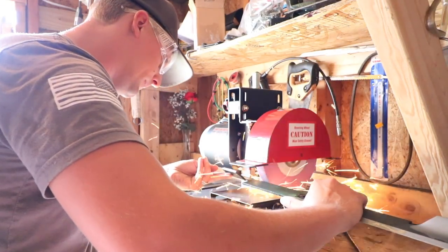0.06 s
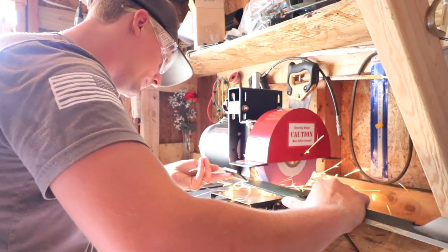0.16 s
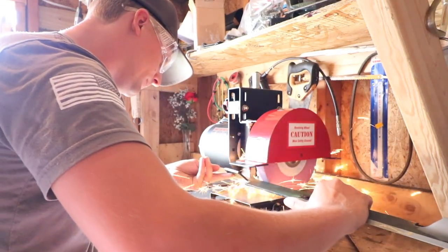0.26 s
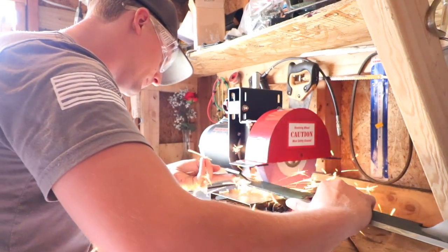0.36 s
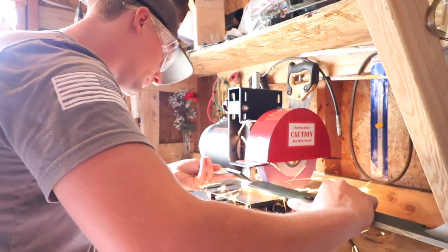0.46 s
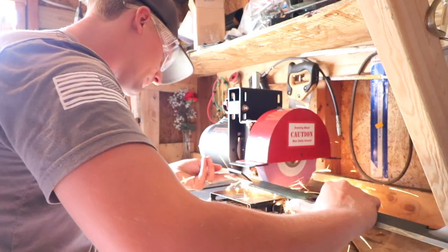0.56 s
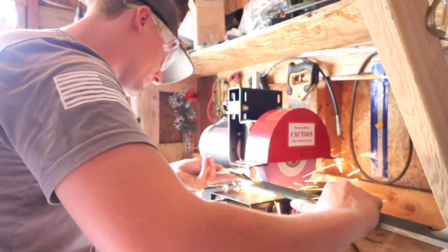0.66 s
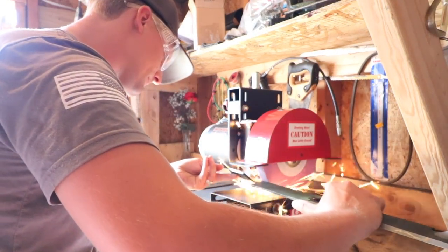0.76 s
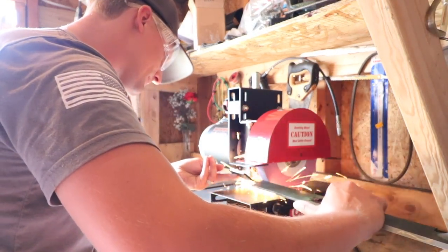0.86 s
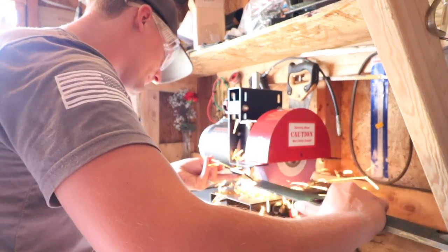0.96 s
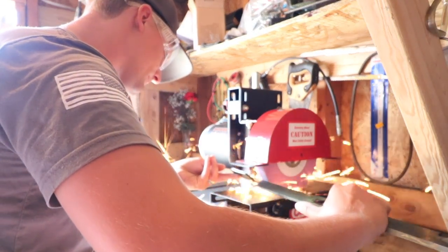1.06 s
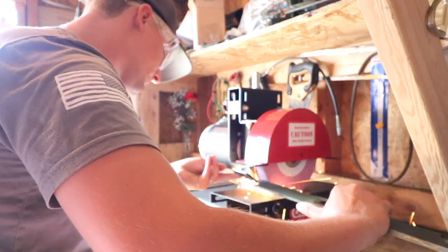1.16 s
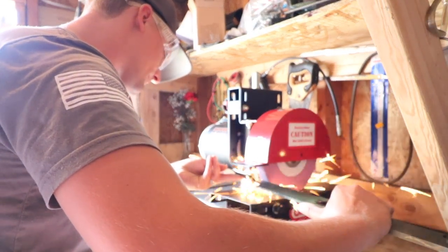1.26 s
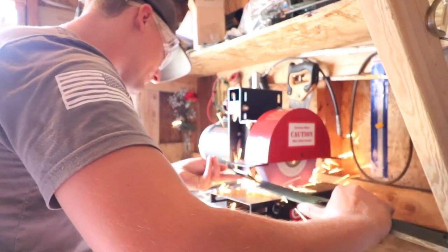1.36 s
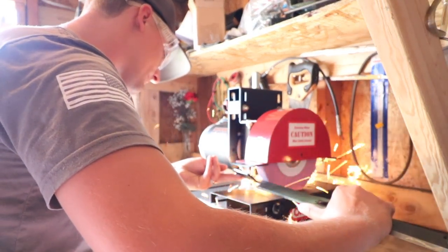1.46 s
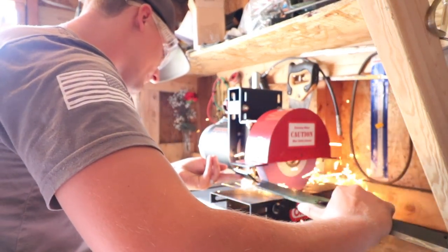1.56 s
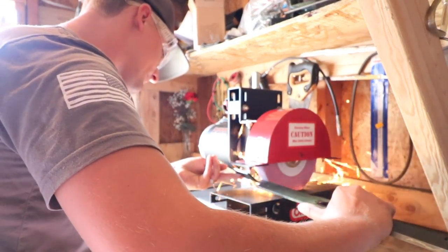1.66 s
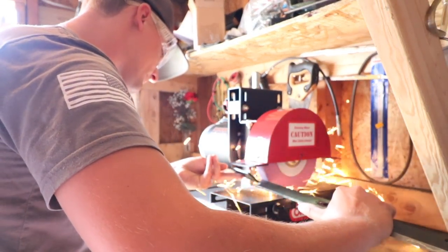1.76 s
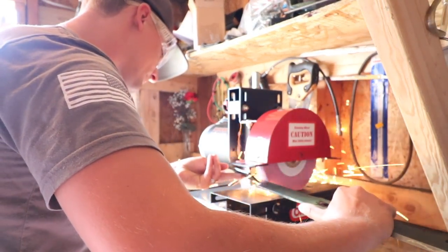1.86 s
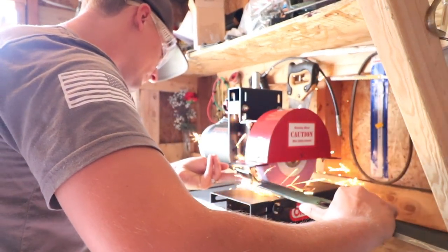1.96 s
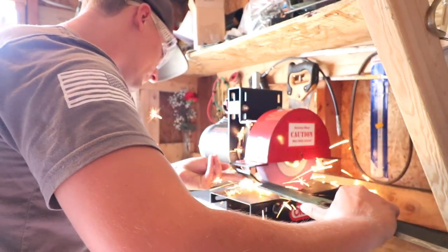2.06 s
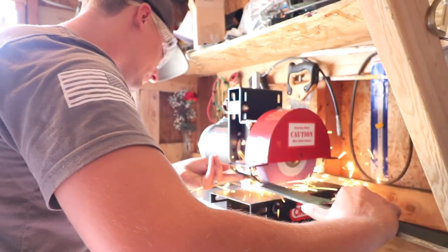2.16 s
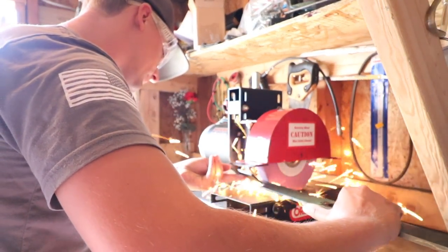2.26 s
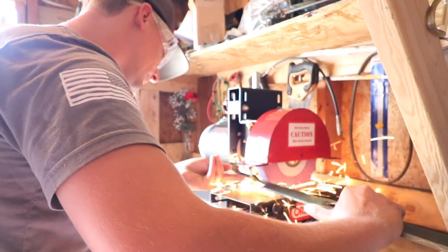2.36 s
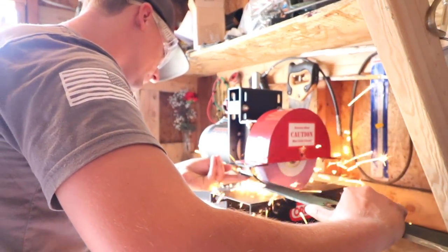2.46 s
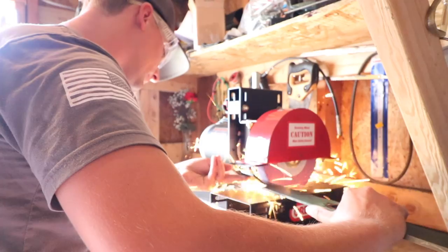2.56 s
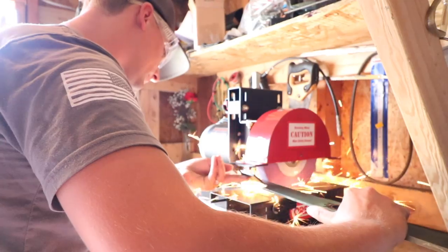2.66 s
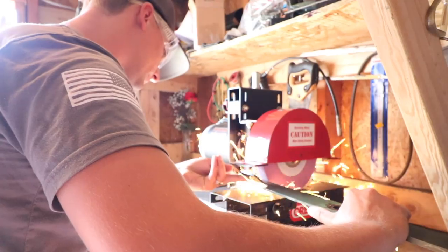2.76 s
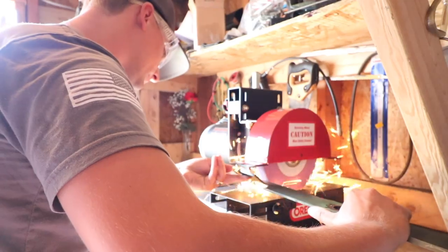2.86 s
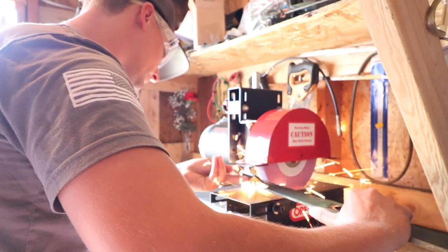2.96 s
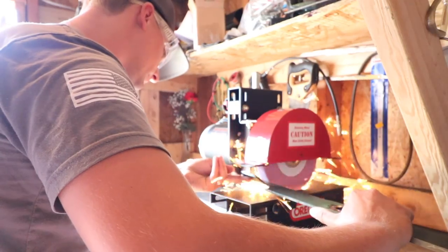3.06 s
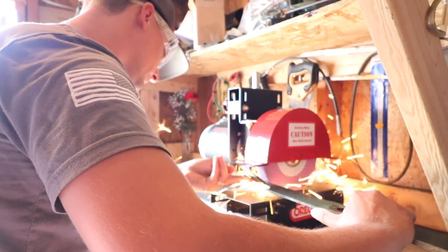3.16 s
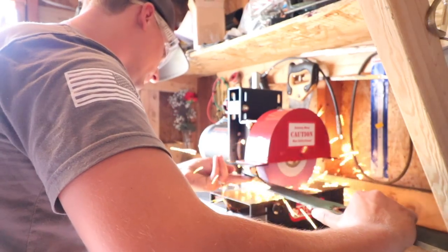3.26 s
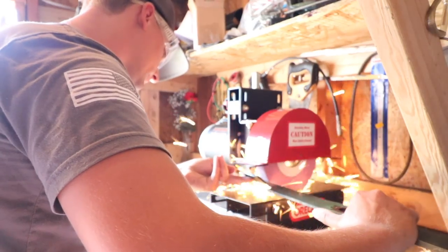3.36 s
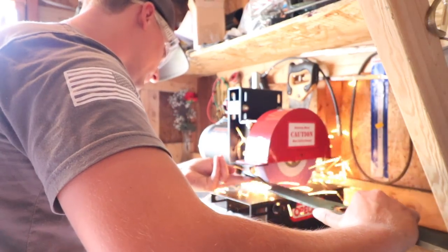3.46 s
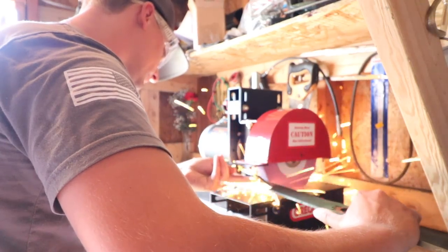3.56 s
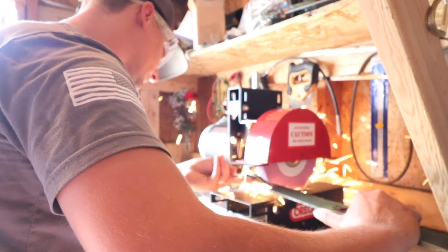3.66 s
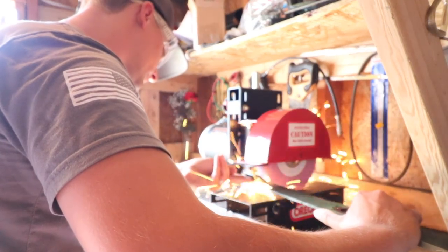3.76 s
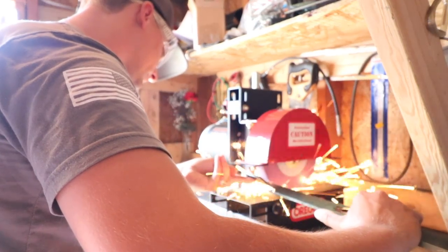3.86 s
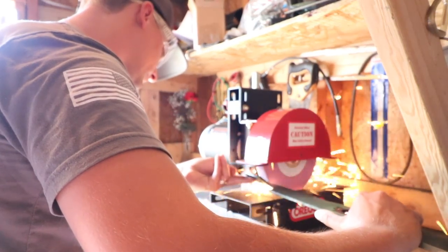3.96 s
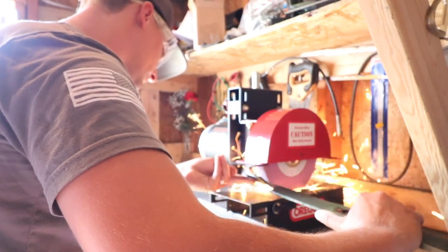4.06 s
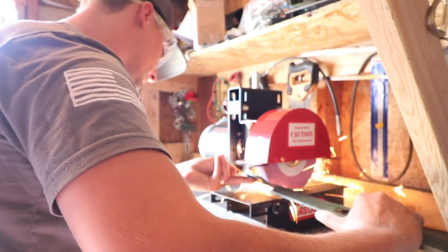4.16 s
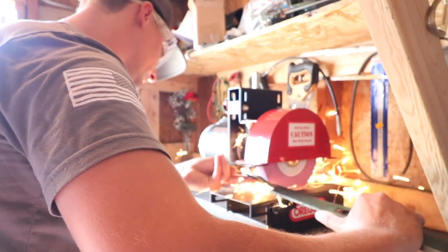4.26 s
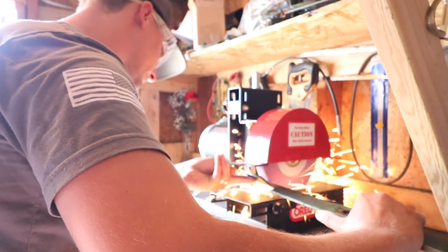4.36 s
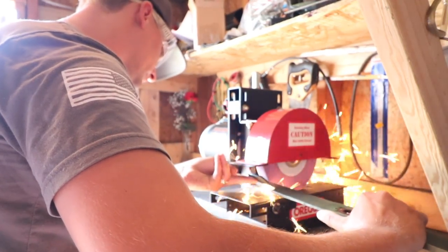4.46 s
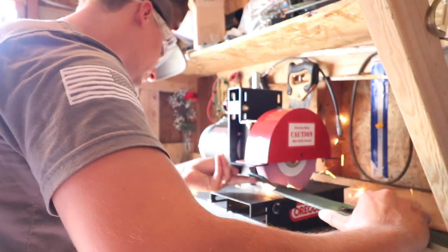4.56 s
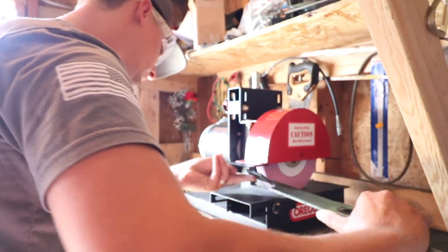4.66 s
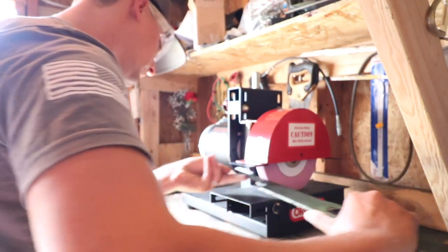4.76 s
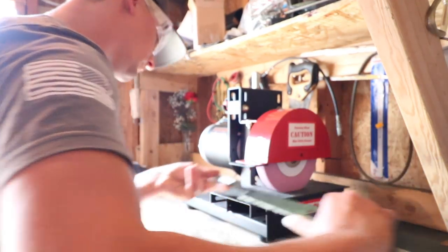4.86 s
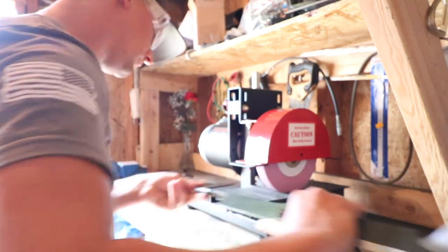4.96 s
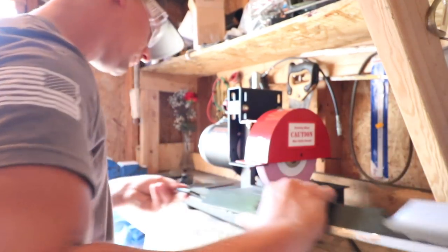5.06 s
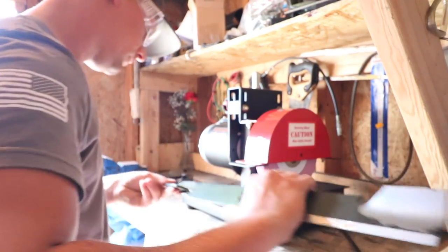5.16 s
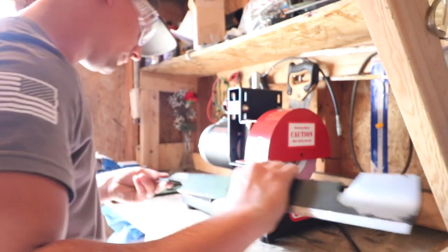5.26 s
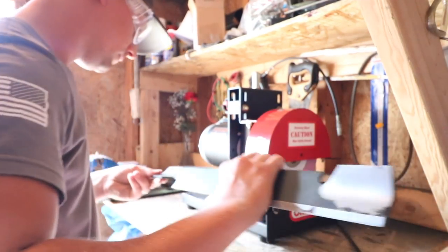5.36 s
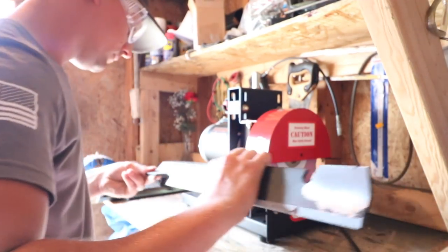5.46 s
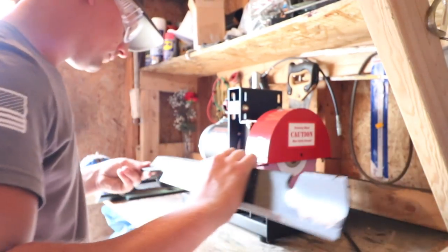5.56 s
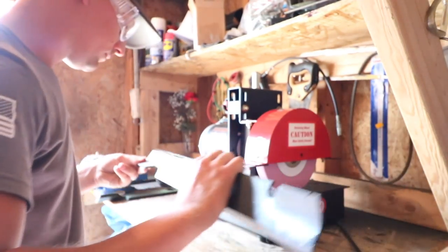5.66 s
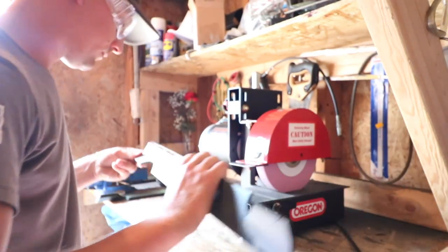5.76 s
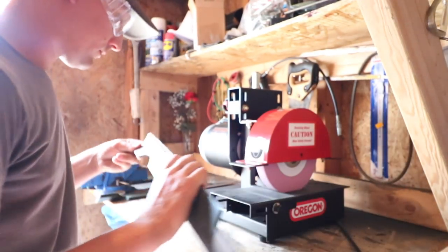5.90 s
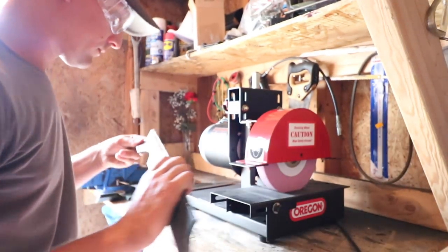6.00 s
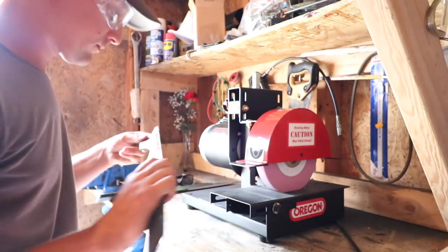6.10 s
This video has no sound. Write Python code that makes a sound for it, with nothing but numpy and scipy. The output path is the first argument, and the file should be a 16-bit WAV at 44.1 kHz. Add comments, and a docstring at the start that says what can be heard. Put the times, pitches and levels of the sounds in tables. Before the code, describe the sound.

A bench grinder rasps and rings loudly against a steel blade, then the grinding stops and the motor hums on.

```python
"""A bench grinder in a shed. From the start a steel blade is drawn along the wheel: grit, much the same
on every turn, rings the blade's modes by where the wheel touches, and ripples in the rim squeal.
Near 4.5 s the blade eases off, then knocks the tool rest as it is lifted away. From 4.8 s the free
motor hums on while the automatic gain creeps back up."""
import sys
import numpy as np
from scipy import signal
from scipy.fft import rfft, irfft, next_fast_len
from scipy.io import wavfile
from scipy.ndimage import uniform_filter1d

SR = 44100
rng = np.random.default_rng(int(sys.argv[2]) if len(sys.argv) > 2 else 0)


def put_to_file(sound):
    """Save the sound as 16-bit audio at rate SR, in the file named by the first command-line argument."""
    columns = np.atleast_2d(sound).T  # one column per channel
    safe = np.clip(columns, -1, 1)
    whole_steps = np.round(safe * 32767)
    wavfile.write(sys.argv[1], SR, whole_steps.astype(np.int16))


N = 270333
TIME_S = np.arange(N) / SR

# wheel drags under load, then runs free: time_s, turns_per_s, grit_repeat_share
WHEEL_MOTION = [(0, 29.67, .9), (1.4, 29.59, .55), (2.5, 29.58, .7), (4.0, 29.52, .62), (4.5, 29.54, .5),
                (4.8, 29.88, .7)]
# blade modes: pitch_hz
BLADE_MODE_HZ = [412, 992, 1175, 1449, 1925, 2257, 2613, 2770, 3203, 3445, 4019, 4146, 4754, 5130, 5270,
                 6000, 6580, 6960, 7450, 7620, 7940, 8350, 8570, 9190, 9510, 9890, 11040, 11410, 11680,
                 12020, 1995]


def undb(db):
    """Decibels to amplitude."""
    return 10 ** (np.asarray(db) / 20)


def level(x, rms_db):
    """Scale to an RMS level."""
    return x * undb(rms_db) / np.sqrt(np.mean(x ** 2))


def curves(table):
    """Per-sample curve of each column after time_s."""
    time_s, *columns = np.transpose(table)
    return [np.interp(TIME_S, time_s, column) for column in columns]


def colour(x, points):
    """Filter by (pitch_hz, gain_db) points on a log-frequency axis."""
    hz, db = np.transpose(points)
    size = next_fast_len(N)
    bin_hz = np.maximum(np.arange(size // 2 + 1) * SR / size, 1)
    return irfft(rfft(x, size) * undb(np.interp(np.log(bin_hz), np.log(hz), db)), size)[:N]


def ring(x, hz, width_hz):
    """One resonance, applied twice for steep flanks; unit RMS."""
    b, a = signal.iirpeak(hz, hz / max(width_hz, 2), fs=SR)
    return level(signal.sosfilt([[*b, *a]] * 2, x), 0)


def walk(rate_hz):
    """Smooth random drift, spread near 1."""
    hold = int(SR / rate_hz)
    steps = np.repeat(rng.standard_normal(N // hold + 2), hold)
    return 1.4 * uniform_filter1d(uniform_filter1d(steps, hold), hold)[:N]


def surface(turns, repeat, points_per_turn=1480):
    """Noise laid round the rim, read by angle, partly renewed each turn."""
    rim = rng.standard_normal((int(turns[-1]) + 1, points_per_turn))
    keep = np.clip(np.interp(np.arange(len(rim)), turns, repeat), 0, .98)
    for k in range(1, len(rim)):
        rim[k] = keep[k] * rim[k - 1] + np.sqrt(1 - keep[k] ** 2) * rim[k]
    return rim.ravel()[(turns * points_per_turn).astype(int)]


def blade(turns, repeat, hollow_share=0.55):
    """Grit drives each mode by its shape at the touching point; the modes share the level."""
    # pressure on the wheel: time_s, level_db, upper_rings_relative_db
    pressure = [(0, -17, -22), (.41, -17.5, -20), (.75, -16.5, -28.5), (1.17, -17.5, -28), (1.24, -13, -22),
                (1.42, -18, -31), (2.0, -18.5, -28), (2.3, -19.5, -27), (2.45, -21, -14),
                (2.78, -17.5, -19), (3.0, -17.5, -27.5), (4.38, -17, -28.5), (4.47, -20.5, -26),
                (4.53, -28, -29), (4.64, -27.5, -19), (4.71, -33, -23), (4.75, -54.5, -30), (4.8, -81, -34)]
    # touching point along the blade: time_s, stroke_fraction
    stroke = [(0, 0), (1.1, 0.38), (2.2, 0.63), (2.75, 0.81), (3.3, 0.9), (4.4, 0.97)]
    # per BLADE_MODE_HZ: width_hz, start_weight_db, end_weight_db, half_waves_crossed,
    # offset_half_waves, share_at_node
    modes = [(17.65, -46.5, -45.5, 1.8, 0.74, 0.61), (70.0, -50, -53, 0.58, 0.63, 0.1),
             (60.3, -46, -48, 0.61, 0.54, 0.15), (80.5, -58.5, -48, 2.4, 0.018, 0.54),
             (39.6, -26.5, -32, 1.51, 0.52, 0.33), (60.0, -54, -39.5, 1.55, 0.54, 0.88),
             (25.1, -29, -38, 0.47, 0.29, 0.2), (30.0, -35.5, -27.5, 1.3, 0.24, 0.15),
             (25.33, -30.5, -33, 1.55, 0.19, 0.11), (51.3, -37, -32.5, 1.09, 0.86, 0.37),
             (35.0, -27, -31.5, 0.63, 0.082, 0.52), (40.3, -28, -27, 0.83, 0.88, 0.5),
             (45.8, -23.5, -23.5, 1.285, 0.6, 0.22), (55.3, -24, -28, 1.58, 0.26, 0.16),
             (55.0, -32.5, -31.5, 1.505, 0.27, 0.28), (66.6, -30.5, -32, 1.82, 0.043, 0.18),
             (40.2, -38, -35.5, 1.65, 0.97, 0.27), (100.0, -37.5, -33.5, 2.995, 0.67, 0.64),
             (40.0, -42, -36.5, 1.55, 0.81, 0.36), (50.0, -39, -39.5, 1.36, 0.99, 0.2),
             (13, -44, -41.5, 1.2, 0.77, 0.31), (50.7, -34, -39, 1.75, 0.67, 0.15),
             (65.0, -48.5, -39.5, 1.4, 0.88, 0.13), (89.9, -33.5, -40, 1.7, 0.62, 0.1),
             (45.5, -37, -36, 1.71, 0.64, 0.073), (50.0, -39.5, -35, 2.09, 0.45, 0.15),
             (35.0, -38, -44, 2.6, 0.05, 0.45), (60.0, -37, -39, 2.6, 0.05, 0.4),
             (40.06, -36.5, -44.5, 1.04, 0.3, 0.29), (50.0, -53.5, -40, 3.3, 0.8, 0.34),
             (60, -39, -36.5, 1.5, .5, 0.24)]
    # thin rings among and above the top modes: pitch_hz, width_hz, weight_db
    upper_rings = [(10500, 82, 0.5), (12250, 110, -2), (12900, 110, -5.5), (13500, 71, -1), (13800, 50, -3),
                   (14600, 90, -4.5), (15100, 45, -11), (15300, 50, -12)]
    # tool rest and bench buzz under the blade: pitch_hz, width_hz, relative_db
    rest_modes = [(190, 44, -47.5), (565, 77, -39.5)]
    level_db, upper_db = curves(pressure)
    place, = curves(stroke)
    # wheel out of true, hand chattering
    runout_db = 1.6 * np.cos(2 * np.pi * turns) + 1.1 * np.cos(4 * np.pi * turns + 1.3)
    bite = undb(runout_db + 0.61 * walk(14)) * (TIME_S < pressure[-1][0])
    # separate rim tracks, so neighbouring rings do not cancel
    tracks = [surface(turns, repeat) * bite for _ in range(3)]
    weights = np.array([undb(start_db + (end_db - start_db) * place)
                        * np.hypot(np.cos(np.pi * (half_waves * place + offset)), at_node)
                        for _, start_db, end_db, half_waves, offset, at_node in modes])
    shares = weights / np.sqrt(np.sum(weights ** 2, axis=0))
    grid_s = TIME_S[::SR // 100]
    dips = [np.interp(TIME_S, grid_s, undb(hollow_share * db)) for db in hollow_db(BLADE_MODE_HZ, grid_s)]
    rings = sum(dips[k] * shares[k] * ring(tracks[k % 2], hz, modes[k][0])
                for k, hz in enumerate(BLADE_MODE_HZ))
    upper = sum(undb(db) * ring(tracks[0], hz, width_hz) for hz, width_hz, db in upper_rings)
    upper += undb(1) * ring(tracks[1], 13600, width_hz=2500)
    rasp = faint_modes(tracks[2], shares * undb(-12 + 3.9 * place))  # grows toward the blade's end
    buzz = sum(undb(db) * ring(tracks[2], hz, width_hz) for hz, width_hz, db in rest_modes)
    return undb(level_db) * (undb(-3) * rings + rasp + buzz + undb(upper_db) * level(upper, 0))


def faint_modes(grit, shares, hiss_gain_db=-6.5):
    """Neighbours of like shape round each blade mode, hiss between, hollows cut out."""
    # the many modes between: pitch_hz, relative_density_db
    hiss_spectrum = [(25, -30), (170, -18.5), (300, -35.5), (800, -9), (1500, -14), (2000, -25),
                     (3500, -23), (5000, -22), (7500, -24), (10450, -15.5), (12300, -21), (13000, -30.5),
                     (15700, -36)]
    hiss_hz, hiss_db = np.transpose(hiss_spectrum)
    hz, frame_s, frames = signal.stft(grit, SR, nperseg=512)
    at = np.minimum((frame_s * SR).astype(int), N - 1)
    power = undb(np.interp(np.log(hz + 1), np.log(hiss_hz), hiss_db) + hiss_gain_db)[:, None] ** 2
    for centre_hz, share in zip(BLADE_MODE_HZ, shares):
        spread_hz = 70 + 0.013 * centre_hz
        skirt = len(hz) * hz[1] / spread_hz / (1 + ((hz - centre_hz) / spread_hz) ** 2) ** 2
        power = power + np.outer(skirt, share[at] ** 2)
    gain = np.sqrt(power) * undb(hollow_db(hz, frame_s))
    return signal.istft(frames * gain, SR, nperseg=512)[1][:N]


def hollow_db(hz, time_s):
    """Nodes pass the touching point from low modes to high, so hollows climb the spectrum."""
    # climbing notches: start_s, end_s, from_hz, to_hz, width_hz, depth_db
    hollows = [(0.22, 1.35, 4900, 8300, 320, 4.5), (1, 2.5, 8500, 10600, 1100, 9),
               (.05, 1.0, 9200, 14500, 600, 11), (2.2, 3.4, 4200, 6900, 340, 8)]
    gain_db = 0
    for start_s, end_s, from_hz, to_hz, width_hz, depth_db in hollows:
        progress = np.clip((time_s - start_s) / (end_s - start_s), 0, 1)
        centre_hz = from_hz + (to_hz - from_hz) * progress
        notch = np.exp(-((np.c_[hz] - centre_hz) / width_hz) ** 2)
        gain_db -= depth_db * np.sqrt(np.abs(np.sin(np.pi * progress))) * notch
    return gain_db


def squeal(turns):
    """Ripples worn into the rim sing a whole number of cycles a turn, next to a mode."""
    # tones, silent unless end_s > start_s: start_s, end_s, near_pitch_hz, level_db
    tones = [(-0.5, 0.69, 1928, -23), (0.1, 1.3, 1924, -25.5), (2.5, 3.35, 1921, -23),
             (4.5, 3.75, 1920, -29.5), (-1.4, 0.39, 2610, -23), (-0.4, 0.45, 4003, -30),
             (0.1, 0.68, 4149, -28.5), (1.63, 2.44, 4144, -25), (1.5, 1.88, 3197, -28),
             (2, 2.36, 3197, -27), (1.7, 1.9, 2782, -32.5), (1.5, 3.3, 2780, -33.5), (1.5, 0.72, 4742, -33),
             (3, 3.6, 4757, -31.5), (3, 4.57, 4755, -26), (2.5, 2.2, 5120, -32.5), (4.5, 4.62, 413, -47)]
    wheel_s, turns_per_s, _ = np.transpose(WHEEL_MOTION)
    out = np.zeros(N)
    for start_s, end_s, hz, db in tones:
        on = slice(max(int(start_s * SR), 0), int(end_s * SR))
        swell = np.sqrt(np.sin(np.pi * np.clip((TIME_S[on] - start_s) / (end_s - start_s), 0, 1)))
        ripples = np.round(hz / np.interp(start_s, wheel_s, turns_per_s))
        angle_rad = 2 * np.pi * turns[on]
        waver = walk(12)[on]
        amplitude = np.sqrt(2) * undb(db + 1.2 * waver + 1.3 * np.cos(angle_rad)) * swell
        out[on] += amplitude * np.cos(ripples * angle_rad + 0.48 * waver)
    return out


def motor(turns, swell_width_hz=60):
    """Shaft orders bunch loosely into a thud each turn, over a partly repeating rattle and mains hum."""
    # shaft harmonics: order, weight_db
    orders = [(1, -12), (2, -14), (3, -13), (4, -6), (5, -17), (6, -18), (7, -8), (8, 0), (9, -7),
              (10, -10), (11, -12), (12, -11), (13, -10), (14, -5), (15, -5), (16, -2), (17, -7), (18, -2),
              (19, -1), (20, -7), (21, -13), (22, -8), (23, -13), (24, -7), (25, -7), (26, -9), (27, -6),
              (28, -8), (29, -16), (30, -10), (31, -12), (32, -11), (33, -17), (34, -18), (35, -10),
              (36, -12)]
    # orders swell as the blade is turned over near the wheel: middle_s, length_s, pitch_hz, lift_db
    swells = [(4.799, .15, 600, 8.5), (5.403, 0.18, 798, 11.5), (5.653, 0.3, 441, 7.5),
              (5.892, 0.21, 548, 7.5)]
    # mains hum: pitch_hz
    mains_hz = [120, 240]
    # per mains_hz: level_db
    mains_db = [-73.5, -66.5]
    # housing rattle and fan: pitch_hz, relative_density_db
    housing = [(35, -29), (60, -18), (240, -20.5), (550, -16), (820, -13), (1100, -16), (1490, -23),
               (2050, -19), (2470, -15), (2700, -14), (3100, -20), (3580, -27.5), (6530, -43.5),
               (15000, -59.5)]
    angle_rad = 2 * np.pi * turns
    free_turns_per_s = WHEEL_MOTION[-1][1]
    lifts = [(hz, db * np.exp(-(2 * (TIME_S - middle_s) / length_s) ** 2))
             for middle_s, length_s, hz, db in swells]
    hum = 0
    for order, weight_db in orders:
        order_hz = order * free_turns_per_s
        lift_db = sum(db * np.exp(-((order_hz - hz) / swell_width_hz) ** 2) for hz, db in lifts)
        amplitude = undb(weight_db + 1.3 * walk(3.4) + lift_db)
        phase_rad = 0.02443 * order ** 2 + 0.99 * rng.standard_normal()  # highs lead
        hum += amplitude * np.cos(order * angle_rad + phase_rad)
    mains = sum(undb(db + 1.2 * walk(2.7)) * np.cos(2 * np.pi * hz * TIME_S)
                for hz, db in zip(mains_hz, mains_db))
    throb = undb(1.2 * np.cos(angle_rad + 0.72) + 1.2 * walk(4.4))
    rattle = surface(turns, repeat=np.full(N, .72)) * throb
    whine = ring(rattle, 2610, width_hz=60) + undb(-4) * ring(rattle, 2760, width_hz=60)
    return level(hum, -54) + level(colour(rattle, housing), -56) + undb(-68) * whine + mains


def knocks():
    """The steel taps the tool rest as it leaves."""
    # taps: time_s, gain_db
    taps = [(4.71, -44), (4.735, -40.5), (4.772, -52), (4.803, -57)]
    # ring of a tap: pitch_hz, relative_db, t60_s
    modes = [(628, -0.5, 0.21), (1262, 4.5, 0.15), (2740, 2, 0.071), (3208, -4, .05)]
    impulses = np.zeros(N)
    for time_s, db in taps:
        impulses[int(time_s * SR)] = undb(db)
    age_s = TIME_S[:SR // 2]
    body = sum(undb(db) * np.sin(2 * np.pi * hz * age_s) * 1000. ** (-age_s / t60_s)
               for hz, db, t60_s in modes)
    return signal.fftconvolve(impulses, body)[:N]


def shed(x, t60_s=.2, tail_db=-15):
    """Wooden walls add a short, even tail."""
    age_s = TIME_S[:SR // 2]
    tail = rng.standard_normal(len(age_s)) * 1000. ** (-age_s / t60_s)
    return x + undb(tail_db) * signal.fftconvolve(x, tail / np.sqrt(np.sum(tail ** 2)))[:N]


def scene():
    """One wheel rotation drives blade, squeal and motor; both channels alike."""
    turns_per_s, repeat = curves(WHEEL_MOTION)
    turns = np.cumsum(turns_per_s) / SR
    steel = blade(turns, repeat) + squeal(turns) + knocks()
    return np.tile(shed(steel) + motor(turns), (2, 1))


def record(dry, loud_db=-34.5, creep_db_per_s=10.5, cutoff_hz=15720):
    """Automatic gain: lowest while the sound is loud, then creeping up; steep low-pass."""
    loud = uniform_filter1d(dry[0] ** 2, SR // 20) > undb(loud_db) ** 2
    since_loud_s = TIME_S - np.maximum.accumulate(np.where(loud, TIME_S, 0))
    lowpass = signal.ellip(14, .2, 80, cutoff_hz, fs=SR, output="sos")
    return signal.sosfilt(lowpass, dry * undb(creep_db_per_s * since_loud_s))


dry = scene()
out = record(dry)
put_to_file(out)
```